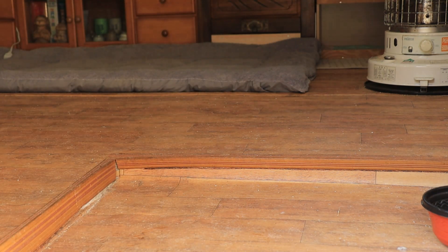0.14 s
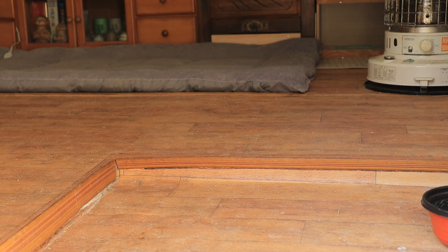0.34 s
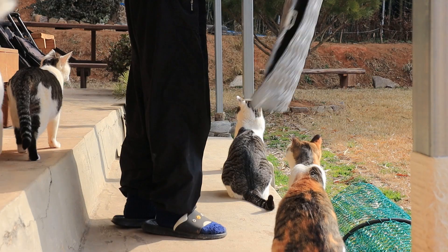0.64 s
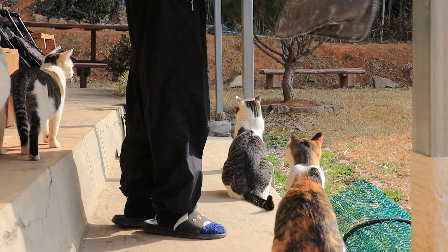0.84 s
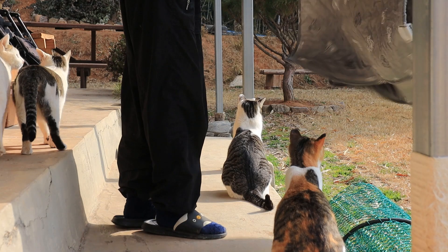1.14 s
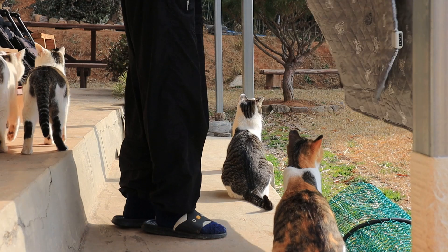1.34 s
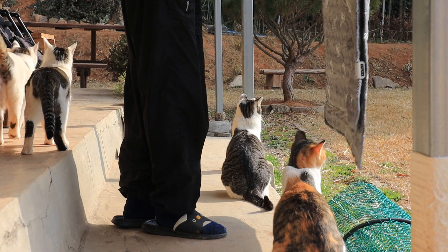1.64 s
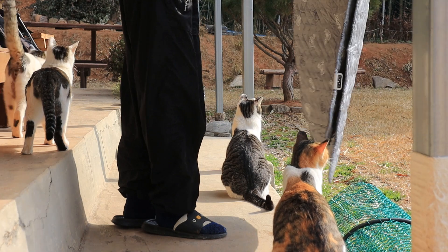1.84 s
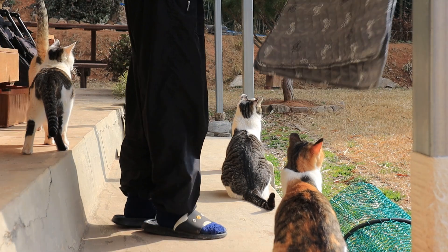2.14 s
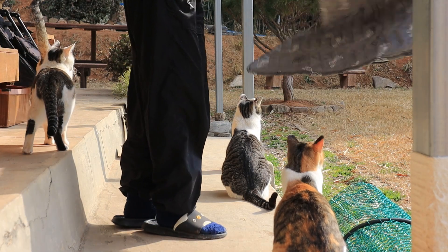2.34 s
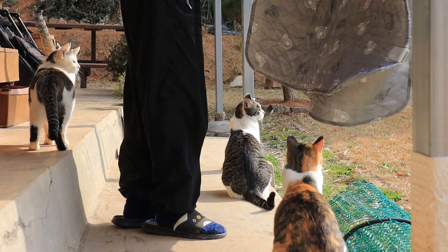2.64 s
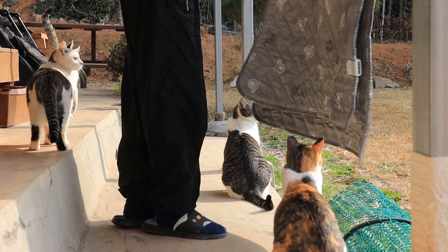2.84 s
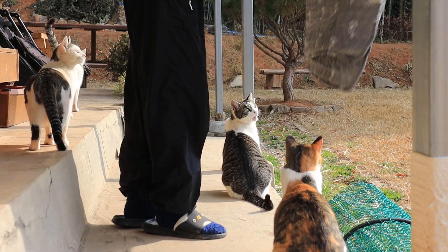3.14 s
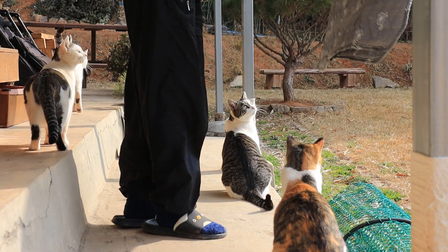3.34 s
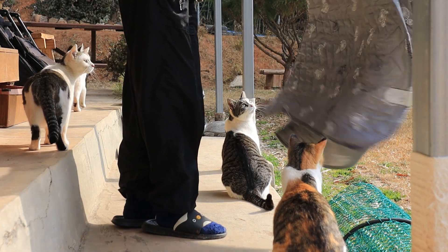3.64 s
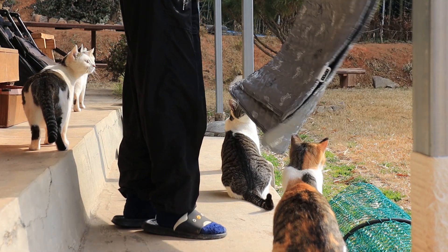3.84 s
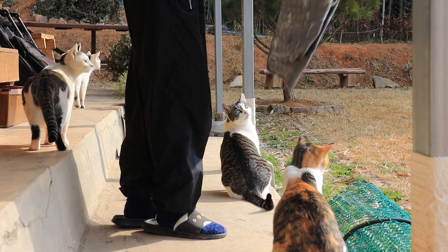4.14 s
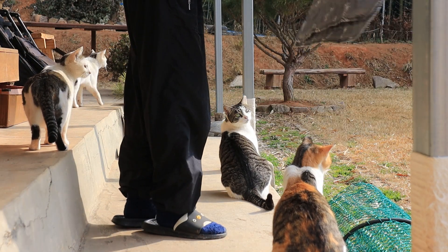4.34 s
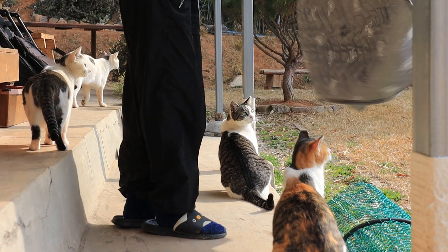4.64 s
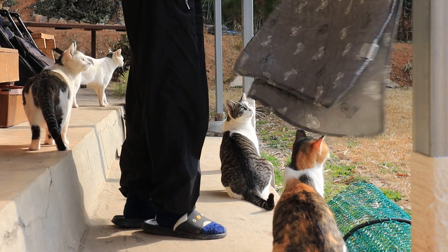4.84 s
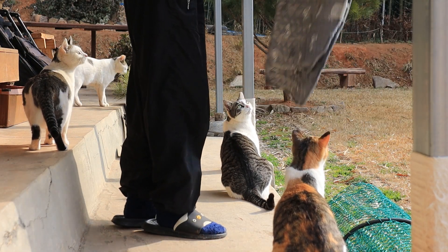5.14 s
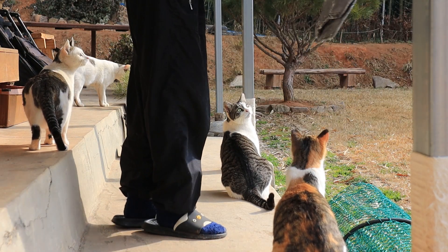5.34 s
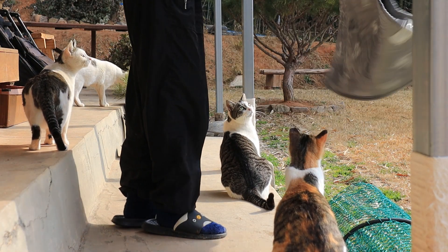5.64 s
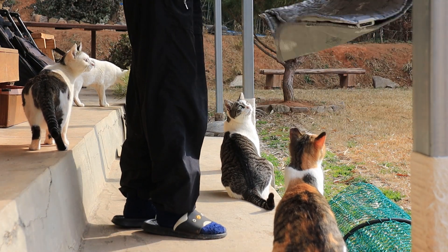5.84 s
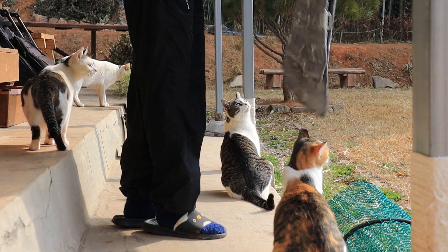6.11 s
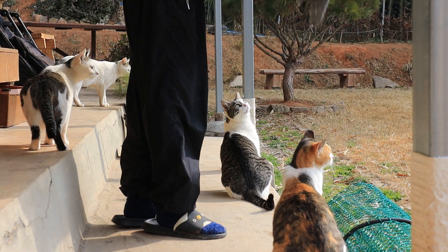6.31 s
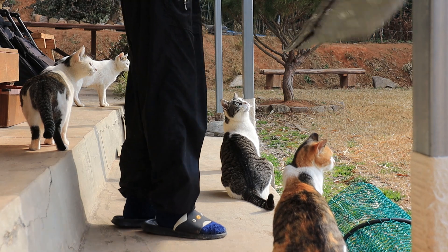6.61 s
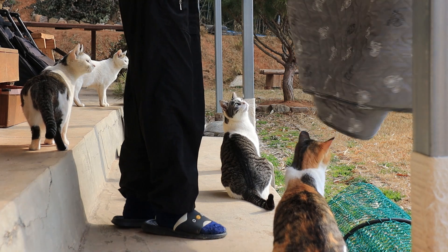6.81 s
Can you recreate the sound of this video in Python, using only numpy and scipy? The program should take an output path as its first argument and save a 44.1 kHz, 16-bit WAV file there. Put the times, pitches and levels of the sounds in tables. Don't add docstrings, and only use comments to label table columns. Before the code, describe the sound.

A heavy padded mat is shaken on a porch: cloth rustles, folds with a dull thud, then cracks tight, six times at a steady pace. Before it, dry plastic-like crackling and ticks; overlapping the first swing, a magpie's raspy paired chatter. Quiet breezy air lies beneath, with short wall reflections, small gusts on the compact microphone and faint hiss.

```python
import sys
import numpy as np
from scipy import signal
from scipy.fft import rfft, irfft
from scipy.io import wavfile
from scipy.ndimage import uniform_filter1d, map_coordinates

SR = 44100
rng = np.random.default_rng(int(sys.argv[2]) if len(sys.argv) > 2 else 0)


def pcm_store(signal):
    levels = np.round(np.clip(np.atleast_2d(signal), -1, 1) * 32767)
    wavfile.write(sys.argv[1], SR, levels.astype(np.int16).T)


def magnitude_from_level(level_db):
    exponent = np.asarray(level_db, float) / 20
    return 10 ** exponent


N = 307377
T = np.arange(N) / SR

# (fold [s], snap [s], fold strength [dB], snap strength [dB], air shove [dB])
SWINGS = [
    (1.102, 1.232, 4.5, 1.5, -19),
    (2.456, 2.581, -1.5, 2, -21),
    (3.545, 3.663, -4, 0, -16),
    (4.61, 4.714, -3, -3, -15),
    (5.624, 5.726, -0.5, -1.5, -15.5),
    (6.682, 6.824, -1.5, 1.5, -16.5),
]
# (time [s], crack peak [dB], gust on the microphone [dB], fibre hiss [dB])
WHIPS = [
    (1.2248, -33, -42, -3),
    (2.591, -18, -42, 3),
    (3.6565, -34, -19, -1),
    (4.7167, -16, -30, 2),
    (5.719, -32, -40, -2),
    (6.8287, -16, -34, -2),
]


def unit(x):
    return x / np.sqrt(np.mean(x ** 2))


def peak(x, db):
    return x * magnitude_from_level(db) / np.max(np.abs(x))


def colour(x, spectrum):
    hz, db = np.transpose(spectrum)
    f = np.maximum(np.arange(N // 2 + 1) * SR / N, 1)
    gain_db = np.interp(np.log(f), np.log(hz), db, left=-90, right=-90)
    return unit(irfft(rfft(x) * magnitude_from_level(gain_db), N))


def band(x, hz, width_hz):
    return signal.lfilter(*signal.iirpeak(min(hz, SR / 2.2), max(hz / width_hz, .3), fs=SR), x)


def walk(rate):
    k = int(SR / rate)
    held = np.repeat(rng.standard_normal(N // k + 1), k)
    return 1.24 * uniform_filter1d(uniform_filter1d(held, k), k)[:N]


def grains(rate, spread_db):
    sizes = rng.standard_normal(N) * magnitude_from_level(spread_db * rng.exponential(size=N))
    return (rng.random(N) < rate / SR) * sizes


def add(out, s, x):
    i = int(s * SR)
    out[i:i + len(x)] += x[:N - i]


def echo(noise, t60, hz, gap):
    t = T[:noise.shape[1]]
    dull, bright = noise * (t > gap)
    dull = signal.lfilter(*signal.butter(1, hz, fs=SR), dull)
    tail = dull * magnitude_from_level(-60 * t / t60) + 0.46 * bright * magnitude_from_level(-120 * t / t60)
    return tail / np.sqrt(np.sum(tail ** 2))


def hush():
    # (frequency [Hz], level [dB per Hz])
    air_tone = [(12, -45), (20, -11), (74, 0.5), (101, -2.5), (270, -6.5), (367, -8.5), (446, -12),
                (590, -11.5), (802, -9), (1660, -13.5), (3950, -14), (5080, -21.5), (6250, -17.5),
                (7300, -23), (16000, -37)]
    air = colour(rng.standard_normal(N), air_tone)
    low = signal.lfilter(*signal.butter(2, 250, fs=SR), air)
    scene_change_s = 0.77
    place_db = -44 - 1.5 * np.clip((scene_change_s - T) / .3, 0, 1)
    breeze = low * magnitude_from_level(0.27 * walk(3.0))
    fields = (air - low) * magnitude_from_level(1.0 * walk(0.84))
    return (breeze + fields) * magnitude_from_level(place_db)


def bump(s, rise, fall):
    return np.exp(np.minimum((T - s) / rise, (s - T) / fall))


def effort(k):
    # (wind-up [dB], at the fold [dB], at the snap [dB], lead on the snap [ms], rise [ms])
    cloth_layers = [
        (-44, -46.5, -36.5, 6, 61),
        (-48.5, -36.5, -68, 17, 120),
        (-42.5, -40.5, -30, -2, 16),
        (-58.5, -69, -57, -10, 35),
    ]
    # (time [s], strength [dB], half length [ms])
    shakes = [(1.03, 7.5, 55), (2.72, -4.5, 31), (2.832, -0.5, 32), (2.98, -1.5, 49), (3.4, -8, 170),
              (3.83, -2.5, 41), (4.308, -9, 54), (5.31, -1, 35), (0.055, -0.5, 23), (2.33, -6, 110),
              (6.45, -10, 66)]
    shake_db = (-56.5, -55.5, -44.5, -64.5)
    settle_s, settle_db = 0.11, -20
    wind_db, fold_db, snap_db, lead, rise = cloth_layers[k]
    out = np.zeros(N)
    for s, db, ms in shakes:
        out += magnitude_from_level(shake_db[k] + db) * np.exp(-((T - s) * 1000 / ms) ** 2)
    for (fold, snap, fold_force_db, snap_force_db, shove_db), whip in zip(SWINGS, WHIPS):
        top = snap - lead / 1000
        force_db = (snap_force_db, shove_db + 18, snap_force_db, whip[3])[k]
        burst = bump(top, rise / 1000, 0.027)
        settling = magnitude_from_level(settle_db) * bump(top, rise / 1000, settle_s)
        out += magnitude_from_level(wind_db) * bump(snap, 0.12 + snap - fold, settle_s)
        out += magnitude_from_level(fold_db + fold_force_db) * bump(fold, 0.007, 0.092)
        out += magnitude_from_level(snap_db + force_db) * (burst + settling)
    return out


def swing():
    # (frequency [Hz], level [dB per Hz])
    swish_tone = [(150, -51), (250, 9.5), (318, 1.5), (737, 3.5), (826, 5), (917, 3.5), (3000, -14.5),
                  (3900, -58), (6600, -120)]
    rustle_tone = [(710, -24), (1200, 1), (1380, -1), (1640, 1), (2420, -2.5), (3030, -1), (4180, -2),
                   (4660, -12), (6210, -8.5), (9000, -42), (11700, -60), (19800, -120)]
    swish = colour(rng.standard_normal(N) + 0.83 * grains(500, 2.0), swish_tone)
    swish = swish * magnitude_from_level(1.4 * walk(50))
    flutter = unit(band(band(rng.standard_normal(N), 135, 190), 160, 380))
    flutter = flutter * magnitude_from_level(1.7 * walk(25))
    rustle = colour(rng.standard_normal(N) + 1.05 * grains(1200, 2.4), rustle_tone)
    rustle = rustle * magnitude_from_level(2.14 * walk(70) - 2.0)
    hiss = unit(band(band(rng.standard_normal(N), 7600, 5400), 8800, 6200))
    hiss = hiss * magnitude_from_level(2.8 * walk(66) + 3.5)
    return sum(layer * effort(k) for k, layer in enumerate((swish, flutter, rustle, hiss)))


def crinkle():
    # (time [s], level [dB])
    creasing = [
        (0.18, -45),
        (0.202, -61),
        (0.248, -40.5),
        (0.302, -44),
        (0.31, -35.5),
        (0.456, -38),
        (0.556, -56),
        (0.562, -48),
        (0.6, -61),
    ]
    # (frequency [Hz], level [dB per Hz])
    film_tone = [(240, -33), (400, -7), (526, -13), (1140, -4.5), (1740, -6.5), (3720, -7.5), (4200, -3),
                 (5030, -13.5), (6420, -9), (15000, -34)]
    # (time [s], peak [dB], pitch [Hz], decay [ms])
    ticks = [(0.249, -25, 4010, 4), (0.253, -21, 2360, 2.2), (0.267, -26, 3580, 3.5),
             (0.3105, -24, 3920, 4), (0.35, -22, 4340, 4), (0.3794, -23, 1370, 7.1),
             (0.404, -17.5, 4080, 4.4), (0.441, -14.5, 2800, 8.8), (0.45, -21, 2810, 5.5),
             (0.4964, -28, 1850, 5.8), (0.289, -29, 8000, 2), (0.531, -35, 5000, 2), (0.559, -36, 6000, 2),
             (0.619, -33, 4500, 2), (2.0994, -45, 1430, 4), (2.829, -36, 2540, 3.3),
             (4.3094, -29, 2180, 3.7), (5.2986, -42, 2040, 4)]
    s, db = np.transpose(creasing)
    film = colour(rng.standard_normal(N) + 2.4 * grains(500, 1.7), film_tone) * magnitude_from_level(2.0 * walk(56.3))
    out = film * magnitude_from_level(np.interp(T, s, db, left=-90, right=-90))
    for (s, db, hz, ms), noise in zip(ticks, rng.standard_normal((len(ticks), 4000))):
        tick = noise * np.exp(-T[:4000] * 1000 / ms)
        tick = band(band(tick, hz, 0.19 * hz), hz, 1.0 * hz)
        add(out, s, peak(tick, db - 6.0))
    return out


def magpie():
    # (time [s], level [dB], swell [ms], hold [ms], beak closed at the start [0-1])
    chatter = [
        (.857, -29.5, 21, 54, 0.3),
        (.950, -18.5, 5.8, 19, 0.06),
        (1.085, -21, 26, 42, .15),
        (1.178, -18.5, 3.6, 18, .01),
        (1.368, -22, 47, 25, .15),
        (1.462, -18.5, 3.9, 23.4, 0.03),
    ]
    # (frequency [Hz], width [Hz], level [dB])
    throat = [(1870, 490, 2), (2194, 400, 9), (2605, 350, 7.5), (3170, 260, -31), (4600, 220, -7.5),
              (6420, 270, -14)]
    out, t = np.zeros(N), T[:9000]
    for (s, db, swell, hold, closed), noise in zip(chatter, rng.standard_normal((len(chatter), 4, 22000))):
        pulse_hz = 165 * (1 + 2.7 * uniform_filter1d(noise[0, :9000], size=300))
        phase = np.cumsum(pulse_hz) / SR % 1
        rasp = noise[1, :9000] * (.45 + np.exp(-phase / .25))
        beak_db = 5 - 10 * closed
        voice = np.zeros(len(t))
        for f, width, gain_db in throat:
            gain = magnitude_from_level(gain_db + beak_db * (f > 3000)) / np.sqrt(width)
            voice += gain * band(band(rasp, f, width), f, 2 * width)
        opening = np.cumsum(1 - closed * np.exp(-t / .035))
        voice = map_coordinates(voice, [opening], order=3)
        attack = np.clip(t * 1000 / swell, 0, 1) ** 0.88
        release = np.exp(-np.maximum(t * 1000 - swell - hold, 0) / 13)
        voice = signal.lfilter(*signal.butter(6, 1500, "high", fs=SR), voice)
        call = unit(voice) * attack * release * magnitude_from_level(db)
        add(out, s, call)
        add(out, s, magnitude_from_level(-11) * signal.fftconvolve(call, echo(noise[2:], 0.48, 9000, 0.015)))
    return out


def slap_rows():
    # (time [s], peak [dB], pocket pitch [Hz], air thump rel [dB], crack rel [dB])
    pats = [(1.104, -8.5, 729, -11.5, -20), (1.119, -13, 850, -16, -11), (2.437, -22, 790, -6, -18),
            (2.451, -21, 790, -13, -14), (2.474, -21.5, 736, -6.5, -8), (2.531, -21, 743, -10.5, 1),
            (3.55, -20.5, 915, -20, -2), (3.58, -22.5, 780, -17, -10), (3.592, -24.5, 1010, -12, -6),
            (4.599, -6.5, 817, -16.5, -13), (4.6176, -10.5, 748, -21, -14), (4.639, -32.5, 830, 3, -17),
            (5.515, -32.5, 546, -16, -11), (5.62, -10.5, 790, -11, -28), (5.644, -12.5, 730, -23, -8),
            (6.681, -15.5, 766, -15, -28), (6.71, -21.5, 810, -8, -17), (6.734, -32, 930, -3, -13)]
    # (time [s], peak [dB], pocket pitch [Hz], crack rel [dB])
    snaps = [(1.2244, -6, 1160, 4), (1.239, -9.5, 910, -20), (1.269, -22, 1310, 6.5),
             (2.556, -19, 940, -18), (2.57, -9, 1120, -23), (2.581, -4, 960, -28), (2.589, -8.5, 1580, 0),
             (2.601, -16, 1340, -17), (3.632, -24, 1300, -8), (3.657, -3.5, 980, -12),
             (3.6574, -9, 2100, -8), (3.669, -14, 1200, -21), (3.679, -16.5, 590, 2),
             (4.687, -25, 910, -11), (4.695, -10.5, 1360, -14), (4.7092, -6, 1030, -21),
             (4.7165, -9.5, 750, 8.5), (4.726, -19, 619, -16), (4.739, -34, 759, -12),
             (5.704, -15, 1280, 2), (5.712, -17, 910, -13), (5.7176, -12.5, 714, 3), (5.725, -5, 960, -25),
             (5.738, -26, 600, -14), (5.745, -12.5, 1090, -5), (6.805, -15.5, 500, -8),
             (6.818, -17, 910, -11), (6.828, -6, 1660, -5), (6.84, -12, 1170, -9)]
    rows = [(*pat, 7.7) for pat in pats]
    for s, db, hz, crack_db in snaps:
        _, snap, _, _, shove_db = min(SWINGS, key=lambda row: abs(row[1] - s))
        shove_db -= max(320 * (snap - s), 796 * (s - snap))
        decay_ms = 4.6 * np.exp(-.01 * (db + 16))
        rows.append((s, db, hz, shove_db - db, crack_db, decay_ms))
    return rows


def slaps():
    out, t = np.zeros(N), T[:2500]
    padding = signal.butter(2, 6000, fs=SR)
    rows = slap_rows()
    for (s, db, hz, thump_db, crack_db, ms), noise in zip(rows, rng.standard_normal((len(rows), 5, 9000))):
        tau = ms / 1000
        fall = np.exp(-t / tau) * (1 - np.exp(-t / 0.00031))
        ragged = unit(band(band(noise[0, :2500], 1.28 * hz, 1.42 * hz), 1.5 * hz, 2.7 * hz))
        pop = t * np.exp(-t / (0.2 * tau)) * np.sin(2 * np.pi * 1.02 * hz * t)
        pop = peak(pop, db - .6)
        shove = noise[1, :2500] * t * np.exp(-t / 0.0033)
        thump = band(band(shove, 141, 150), 210, 330) + 0.58 * band(band(shove, 320, 93), 393, 770)
        crack = band(band(noise[2, :2500] * fall ** 1.86, 2660, 1900), 2200, 5300)
        cloth = peak(ragged * fall, db - 3.5)
        cloth = cloth + peak(thump, db + thump_db + 7) + peak(crack, db + crack_db - 0.5)
        cloth = signal.lfilter(*padding, cloth)
        add(out, s, pop + cloth)
        to_walls = cloth - 0.64 * band(cloth, 150, 220) + 0.72 * pop
        add(out, s, magnitude_from_level(-7.0) * signal.fftconvolve(to_walls, echo(noise[3:], 0.22, 4900, 0.0036)))
    return out


def hem():
    # (time [s], level [dB], pitch [Hz], half length [ms])
    edge_hiss = [
        (4.697, -37, 8900, 5.8),
        (6.752, -48, 9000, 8),
        (6.79, -44, 9800, 24),
        (6.664, -41, 1450, 17),
        (1.17, -47.5, 8200, 41),
        (1.2, -56, 8300, 25),
        (1.28, -53, 12000, 20),
    ]
    out, t = np.zeros(N), T[:4000]
    middle = t[2000]
    for (s, db, gust_db, _), noise in zip(WHIPS, rng.standard_normal((len(WHIPS), 2, 4000))):
        click = np.exp(-t / 0.00015) + 0.3 * noise[0] * np.exp(-t * 1000 / 1.1)
        click = signal.lfilter(*signal.butter(2, 10500, fs=SR), click)
        add(out, s, peak(click - band(click, 600, 1500) + band(click, 7500, 6000), db))
        puff = np.exp(-((t - middle) * 1000 / 29) ** 2)
        gust = puff * band(band(noise[1] * puff, 80, 70), 80, 120)
        add(out, s + 0.014 - middle, peak(gust, gust_db))
    for (s, db, hz, ms), noise in zip(edge_hiss, rng.standard_normal((len(edge_hiss), 4000))):
        thin = unit(band(band(noise, hz, 0.25 * hz), hz, .5 * hz))
        swell = np.exp(-((t - middle) * 1000 / ms) ** 2)
        add(out, s - middle, magnitude_from_level(db) * thin * swell)
    return out


def scene():
    mat = slaps()
    mat = mat - 0.76 * band(mat, 4960, 2260)
    return (hush() + swing() + crinkle() + magpie() + mat + hem())[None]


def roll_off(x):
    return signal.sosfilt(signal.butter(12, 16300, fs=SR, output="sos"), x)


def record(dry):
    hiss = magnitude_from_level(-57.5) * rng.standard_normal(dry.shape)
    mix = np.tanh(0.89 * (dry + hiss))
    return roll_off(mix)


dry = scene()
out = record(dry)
pcm_store(out)
```